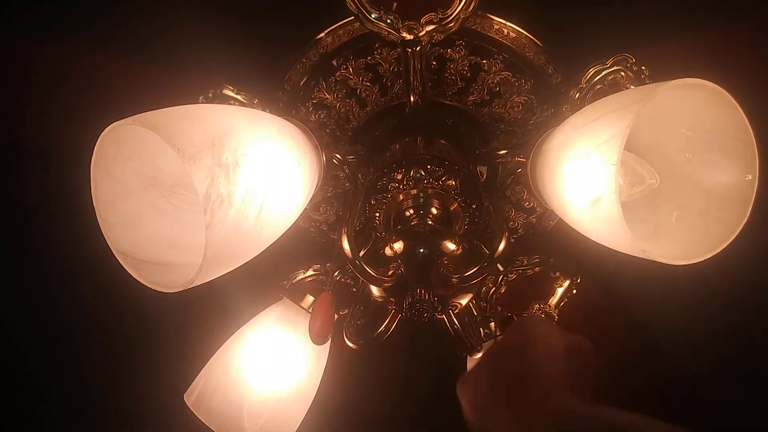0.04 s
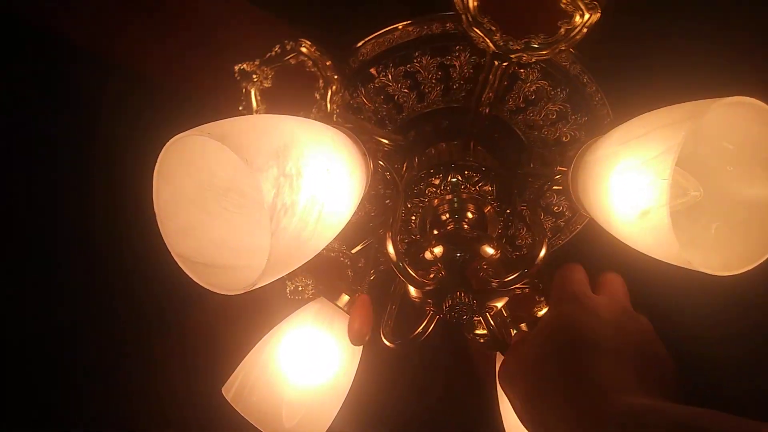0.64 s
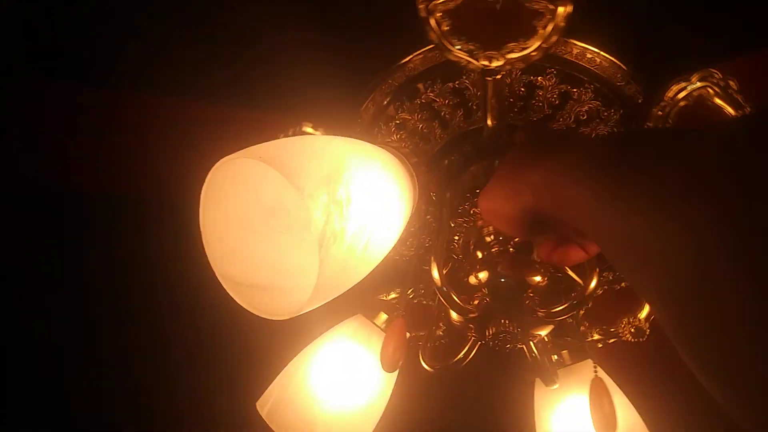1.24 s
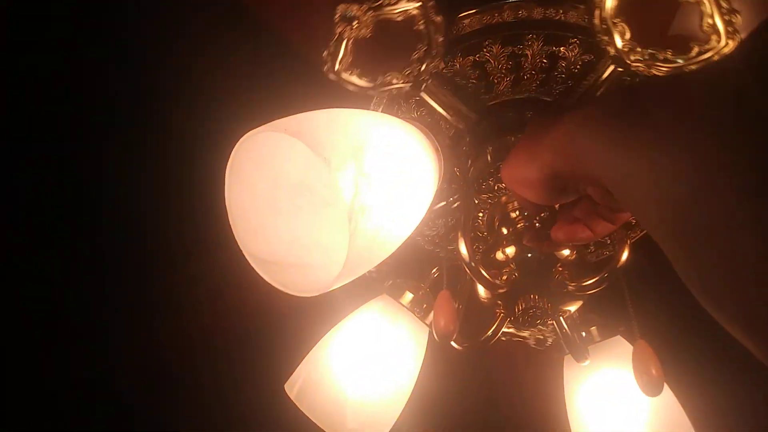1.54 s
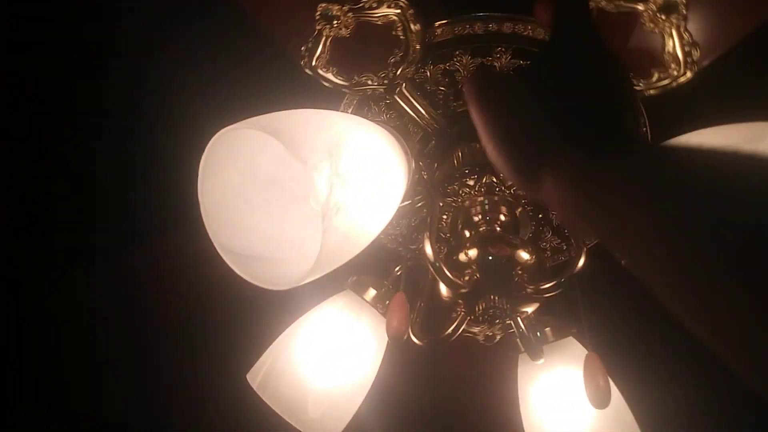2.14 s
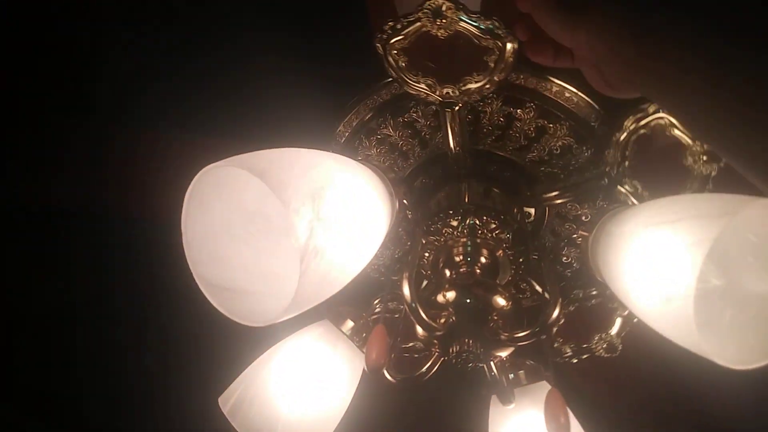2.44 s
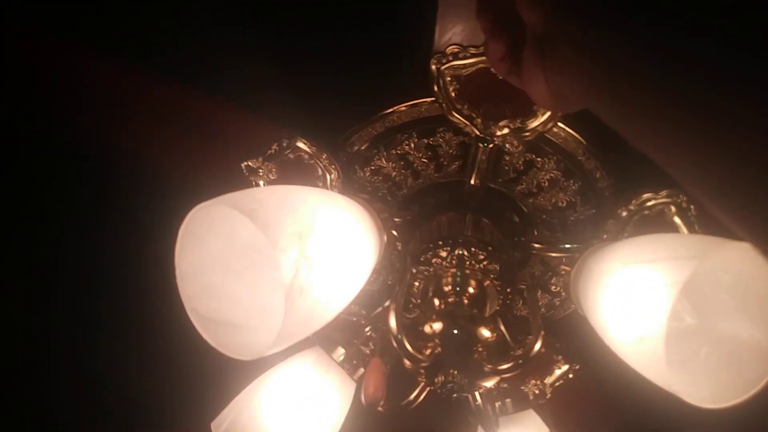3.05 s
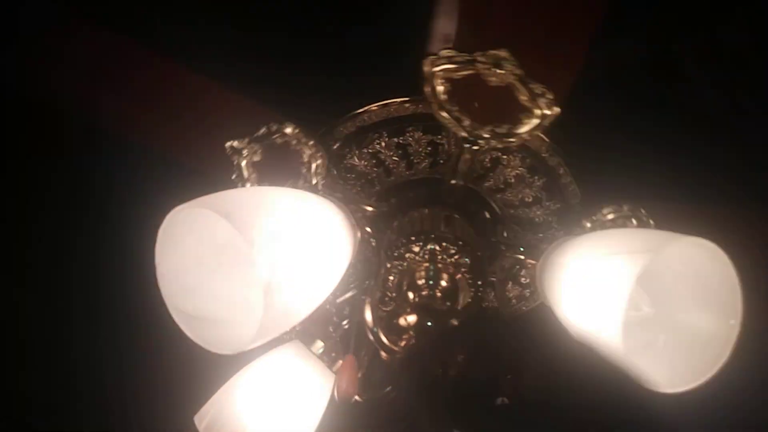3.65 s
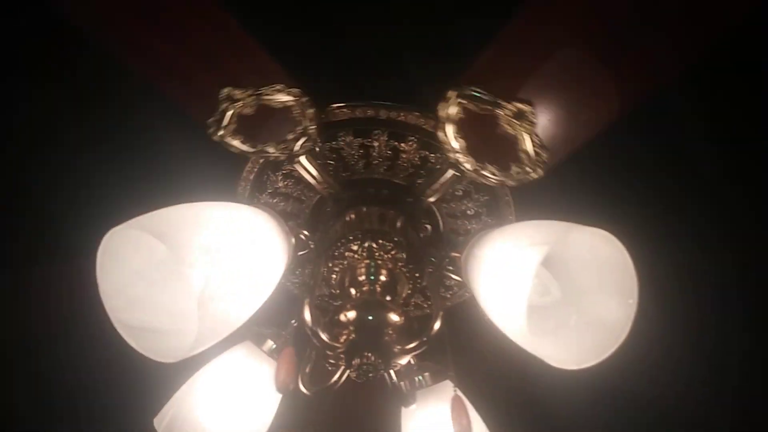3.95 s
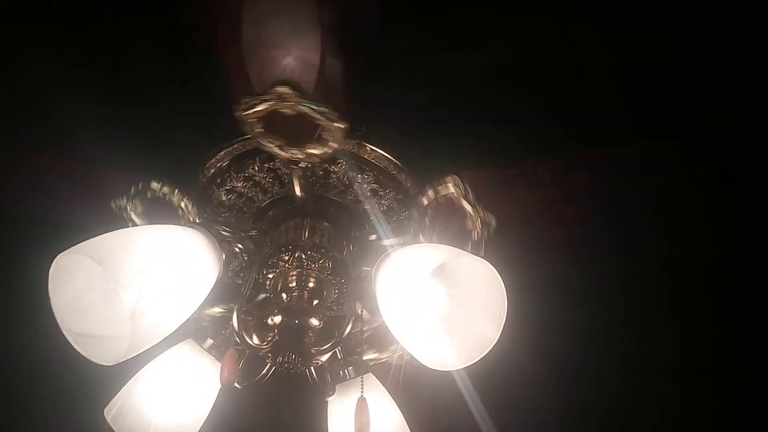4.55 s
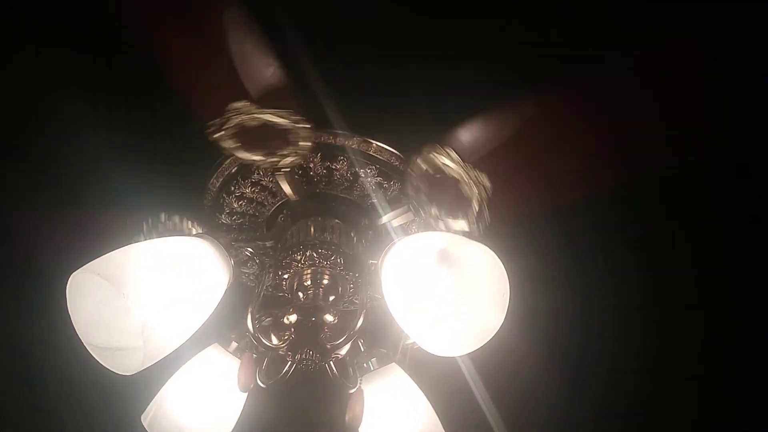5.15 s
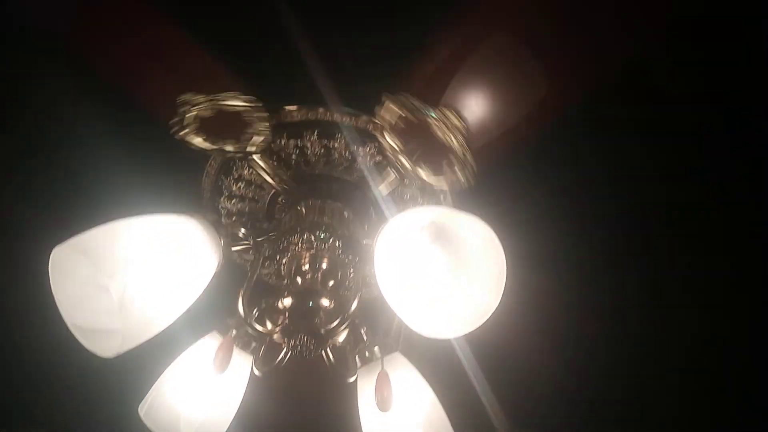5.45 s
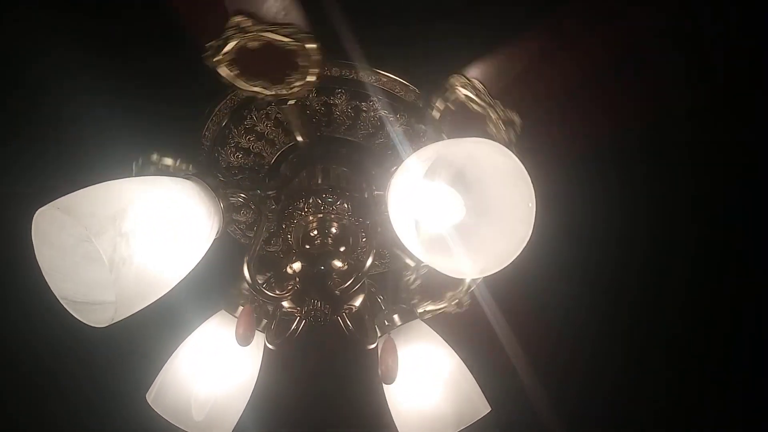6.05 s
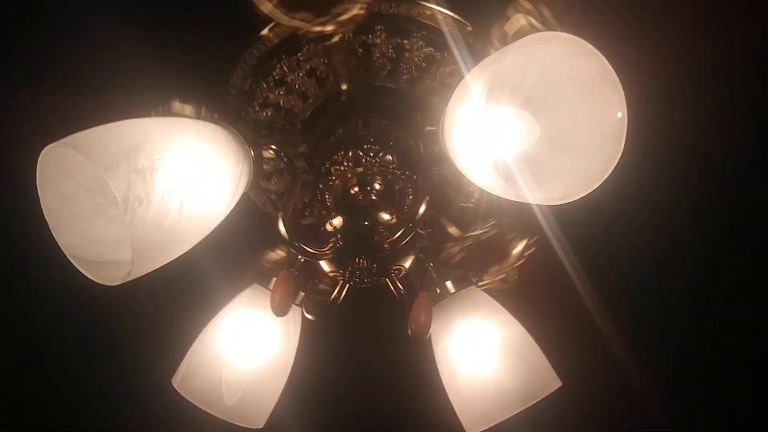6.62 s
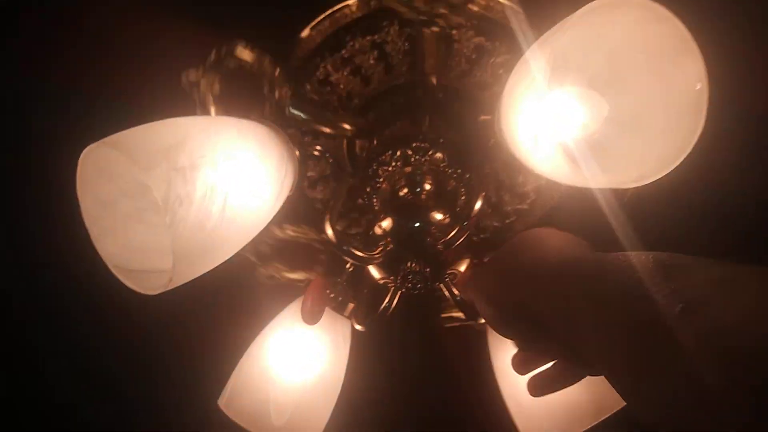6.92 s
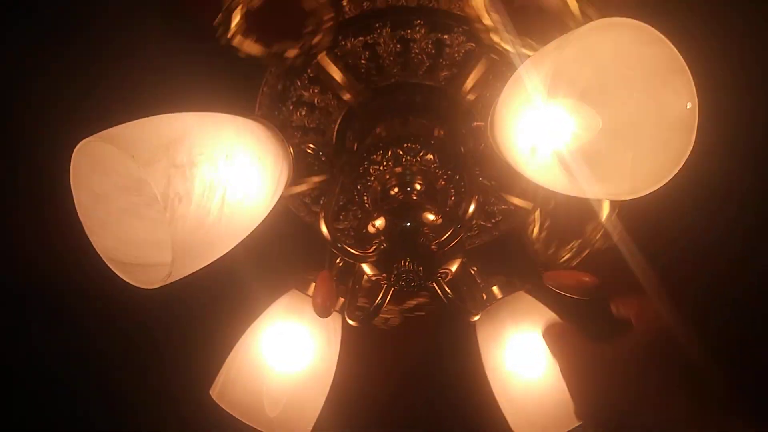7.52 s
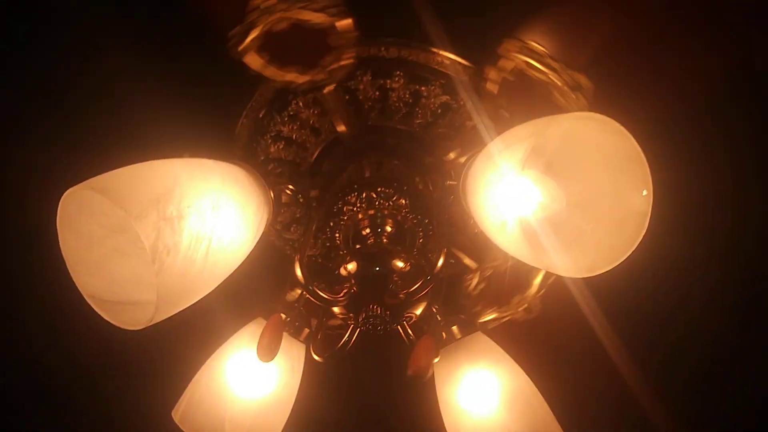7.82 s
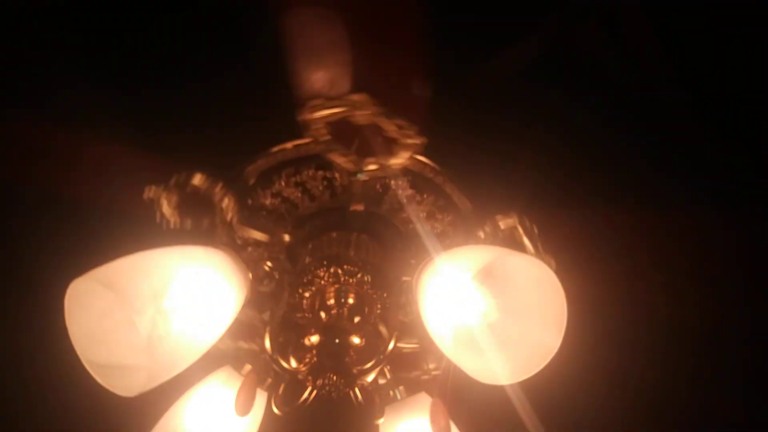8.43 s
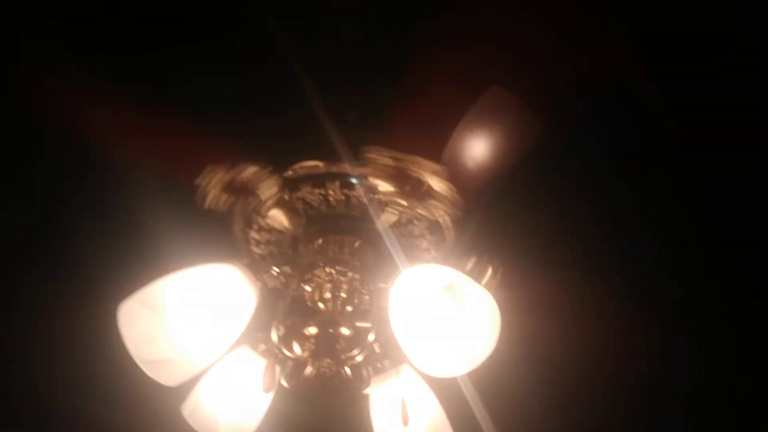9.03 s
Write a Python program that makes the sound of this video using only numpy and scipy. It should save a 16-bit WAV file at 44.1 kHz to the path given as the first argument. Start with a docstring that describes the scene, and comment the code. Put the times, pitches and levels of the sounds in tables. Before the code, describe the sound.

Sharp metallic snaps and bead ticks from a fan's pull chain in a quiet room, against a high hiss that whistles about once a second.

```python
"""A quiet room, close to a ceiling fan whose pull-chain switch is worked a few times.
Chain beads tick through the ferrule; the ratchet slips, snaps and briefly rings the metal housing.
A hand bumps softly among light rustles and faint, breath-like swells of noise.
Behind them lie faint air, a thin electrical whine and a steady high hiss that swirls about
once a second: it sinks in pitch, whistles and goes dull for a moment."""
import sys
import numpy as np
from scipy import signal
from scipy.fft import rfft, irfft
from scipy.io import wavfile
from scipy.ndimage import uniform_filter1d

SR = 44100
rng = np.random.default_rng(int(sys.argv[2]) if len(sys.argv) > 2 else 0)


def unload_wav(signal):
    """Save mono or channel-first audio to the path in sys.argv[1] as 16-bit WAV at rate SR, clipped to [-1, 1]."""
    wavfile.write(
        sys.argv[1],
        SR,
        np.round(np.clip(np.atleast_2d(signal).T, -1, 1) * 32767).astype(np.int16),
    )


N = 409248
TIME = np.arange(N) / SR
AGE = TIME[:SR // 2]  # seconds since a contact


def undb(db):
    """Decibels to gain."""
    return 10 ** (np.asarray(db) / 20)


def unit_rms(x):
    """Scale to rms 1."""
    return x / np.sqrt(np.mean(x ** 2))


def spectrum(colour, size):
    """Gain of a (Hz, dB) outline at each FFT bin."""
    hz, db = np.transpose(colour)
    bin_hz = np.fft.rfftfreq(size, 1 / SR)
    return undb(np.interp(np.log(bin_hz + 1), np.log(hz), db))


def noise(colour):
    """Steady coloured noise, rms 1."""
    white = rfft(rng.standard_normal(N))
    return unit_rms(irfft(white * spectrum(colour, N), N))


def wander(rate_hz):
    """Smooth random curve, rms 1."""
    hold = int(SR / rate_hz)
    steps = np.repeat(rng.standard_normal(N // hold + 1), hold)
    return unit_rms(uniform_filter1d(steps, hold)[:N])


def streaks(bins, frames):
    """Random field, narrow in frequency and drawn out in time, rms 1."""
    field = rng.standard_normal((bins, frames))
    for _ in range(2):
        field = uniform_filter1d(field, size=2, axis=0)
        field = uniform_filter1d(field, size=6, axis=1)
    return unit_rms(field)


def swell(peak_s, sigma_s, time=TIME):
    """Gaussian rise and fall, peak 1."""
    return np.exp(-.5 * ((time - peak_s) / sigma_s) ** 2)


def add(track, start_s, sound):
    """Mix a sound into a track."""
    start = int(start_s * SR)
    track[start:start + len(sound)] += sound[:N - start]


# Room air spectrum. Each row: frequency in Hz, relative level in dB.
AIR_SPECTRUM = [(25, -34), (80, -24.5), (150, -17), (250, -5), (420, 0.5), (950, 2.5), (1500, -0.5),
                (2300, 0.5), (4000, -16), (9000, -38)]


def room_air(level_db=-64.0, drift_db=.5):
    """Faint air noise whose level drifts slightly."""
    return noise(AIR_SPECTRUM) * undb(level_db + drift_db * wander(2.89))


# Spells of whine. Each row: start in seconds, end in seconds.
WHINE_SPANS = [(.78, 1.38), (4.52, 5.3)]


def electrical_whine(level_db=-73, pitch_hz=14000):
    """A thin electrical tone that switches on and off."""
    gate = sum(((TIME > start_s) & (TIME < end_s)).astype(float) for start_s, end_s in WHINE_SPANS)
    tone = np.sin(2 * np.pi * pitch_hz * TIME)
    return undb(level_db) * uniform_filter1d(gate, size=400) * tone


# Swirls of the hiss. Each row: time in seconds, whistle level in dB, its sigma in seconds,
# its pitch in Hz, extra gain of its lowest tone in dB.
SWIRL_EVENTS = [(0.21, -38, 0.047, 4090, 0), (1.372, -39, 0.096, 3990, 7.5), (2.293, -40.5, 0.15, 4030, 9),
                (3.472, -44, 0.12, 3985, 7), (4.53, -39, 0.082, 3920, -3), (5.57, -38.5, 0.12, 3916, -7),
                (6.544, -36, 0.079, 3893, 1.5), (7.57, -36, 0.049, 3937, 2), (8.49, -39, 0.092, 3930, 0),
                (9.25, -42, 0.054, 4020, 0)]
# Tones of a whistle. Each row: ratio to the pitch, relative level in dB.
WHISTLE_TONES = [(.812, -15.5), (.904, -9), (1, 0.5), (1.093, -4), (1.182, -31), (1.285, -23), (1.379, -39),
                 (1.476, -19)]


def whistle(linewidth_hz=9, flutter_db=2, lead_s_per_octave=0.13):
    """At each swirl a ladder of thin, fluttering tones swells out of the hiss, highest first."""
    out = np.zeros(N)
    for rung, (ratio, tone_db) in enumerate(WHISTLE_TONES):
        phase_walk = uniform_filter1d(np.cumsum(rng.standard_normal(N)), size=200)
        drift_rad = phase_walk * np.sqrt(2 * np.pi * linewidth_hz / SR)
        flutter = undb(tone_db + flutter_db * wander(60))
        for swirl_s, level_db, sigma_s, pitch_hz, lowest_db in SWIRL_EVENTS:
            peak_s = swirl_s - lead_s_per_octave * np.log2(ratio)
            span = slice(max(0, int((peak_s - 4 * sigma_s) * SR)), int((peak_s + 4 * sigma_s) * SR))
            tone = np.sin(2 * np.pi * ratio * pitch_hz * TIME[span] + drift_rad[span])
            gain = undb(level_db + lowest_db * (rung == 0))
            out[span] += gain * swell(peak_s, sigma_s, TIME[span]) * flutter[span] * tone
    return out


# Hiss spectrum. Each row: frequency in Hz, relative level in dB.
HISS_SPECTRUM = [(900, -47.5), (2200, -32.5), (2630, -24), (3000, -13.5), (3500, -5), (3900, 1), (4650, 1),
                 (5230, -6.5), (5670, -14), (6260, -18.5), (7300, -26), (8600, -37), (12000, -39.5),
                 (15500, -40.5)]
# Dulling after a swirl. Each row: frequency in Hz, gain at the deepest point in dB.
DULLING_EQ = [(2800, -2), (3500, -0.5), (4100, -2), (4900, -2.5), (6100, -3), (7500, -0.5)]


def hiss(level_db=-39, streak_db=2.25, crest_db=1.5, crest_sigma_hz=320, sink_hz_per_s=4000):
    """Narrow high hiss, slowly brightening; at each swirl a crest slides down it, then it dulls."""
    hz, time, bands = signal.stft(noise(HISS_SPECTRUM), SR, nperseg=2048)
    hz = hz[:, None]
    octaves = np.log2(np.clip(hz, 2900, 6500) / 4200)
    tilt_db_per_octave = -1.16 + 0.24 * time
    gain_db = level_db + octaves * tilt_db_per_octave
    dull_db = np.interp(hz, *np.transpose(DULLING_EQ))
    for swirl_s, _, _, pitch_hz, _ in SWIRL_EVENTS:
        centre_hz = pitch_hz - sink_hz_per_s * (time - swirl_s)
        crest = np.exp(-.5 * ((hz - centre_hz) / crest_sigma_hz) ** 2)
        gain_db += crest_db * crest * swell(swirl_s - 0.13, sigma_s=0.061, time=time)
        gain_db += dull_db * swell(swirl_s + .05, sigma_s=0.082, time=time)
    gain_db += streak_db * streaks(*bands.shape) * (hz < 7000)
    return signal.istft(bands * undb(gain_db))[1][:N]


# Rustles and breath-like swells. Each row: peak time in seconds, level in dB, sigma in seconds.
RUSTLE_SWELLS = [(1.3, -51.5, 0.12), (4.047, -53.5, 0.1), (4.66, -56.5, 0.032), (5.16, -48.5, 0.03),
                 (5.304, -57.5, 0.039), (5.886, -50, 0.022), (6.347, -52.5, 0.021), (6.49, -36.5, 0.01),
                 (6.53, -46.5, 0.044), (8.14, -53, 0.02), (8.52, -52.5, 0.02), (8.765, -52.5, 0.05),
                 (9.23, -52, 0.043)]
# Their spectrum. Each row: frequency in Hz, relative level in dB.
RUSTLE_SPECTRUM = [(100, -31), (250, -30), (500, -0.5), (1000, -0.5), (1800, 4), (2400, 6.5), (4000, 1),
                   (7000, -13), (10000, -23.5), (15000, -41)]


def rustles(grain_db=2.5, grain_hz=120):
    """Soft rustles and faint, longer breath-like swells of noise."""
    envelope = sum(undb(db) * swell(peak_s, sigma_s) for peak_s, db, sigma_s in RUSTLE_SWELLS)
    return envelope * undb(grain_db * wander(grain_hz)) * noise(RUSTLE_SPECTRUM)


# Soft bumps: mostly the hand, plus low thumps under the snaps at 1.713 s and 7.392 s. Each row: start in
# seconds, gain in dB, decay time constant in seconds.
BUMPS = [(1.008, -38.5, 0.0034), (1.164, -46.5, 0.042), (1.265, -58.5, 0.085), (1.713, -45, .015),
         (1.99, -56.5, .04), (3.768, -48, 0.0097), (4.075, -46, 0.034), (4.314, -58, 0.034),
         (4.403, -55.5, 0.055), (6.476, -55.5, 0.047), (6.656, -46, 0.009), (6.709, -43.5, 0.0092),
         (7.392, -52, 0.036), (8.492, -45, 0.021)]
# Bump spectrum. Each row: frequency in Hz, relative level in dB.
BUMP_SPECTRUM = [(60, -49), (130, -13.5), (250, 1), (450, 5.5), (800, 3), (1500, -3.5), (3000, -6),
                 (9000, -38)]


def bumps(attack_s=0.0017, bass_cycles=4):
    """Dull bumps that die quickly; the briefest have the least bass."""
    out, knock = np.zeros(N), noise(BUMP_SPECTRUM)
    for start_s, gain_db, decay_s in BUMPS:
        highpass = signal.butter(2, bass_cycles / decay_s, "high", fs=SR, output="sos")
        body = signal.sosfilt(highpass, knock[int(start_s * SR):][:len(AGE)])
        envelope = (1 - np.exp(-AGE / attack_s)) * np.exp(-AGE / decay_s)
        add(out, start_s, undb(gain_db) * envelope * body)
    return out


def low_thump(level_db=-52):
    """A very faint, brief low thump under one loud snap."""
    return undb(level_db) * swell(peak_s=7.272, sigma_s=0.00094)


def impact(colour, body_db, treble_db, size=1024):
    """Minimum-phase crack of one contact, shelved below and above its main resonance."""
    shelves = spectrum([(2000, body_db), (3600, 0.01), (4800, 0), (7500, treble_db)], size)
    base = spectrum(colour, size)
    cepstrum = irfft(np.log(base * shelves))
    cepstrum[1:size // 2] *= 2
    cepstrum[size // 2 + 1:] = 0
    return irfft(np.exp(rfft(cepstrum))) / base.mean()


def room_response(scatter_db, scatter_s, tail_db, t60_s=0.35, onset_s=0.0017):
    """Direct sound, quick scatter from the glass shades and ceiling, then the room's tail."""
    scatter = undb(scatter_db) * np.exp(-AGE / scatter_s) * rng.standard_normal(len(AGE))
    tail = undb(tail_db - 60 * AGE / t60_s) * rng.standard_normal(len(AGE))
    response = (scatter + tail) * (1 - np.exp(-(AGE / onset_s) ** 2))
    response[0] = 1
    return response


# Bead ticks. Each row: start in seconds, gain in dB, treble shelf in dB.
BEAD_TICKS = [(0.0592, -17.5, -1), (0.077, -14.5, 1), (0.5328, -16, 4), (1.781, -22, -12), (7.1158, -15, 0),
              (7.135, -15, -3), (7.2352, -24, 13), (7.2578, -17.5, 10), (7.362, -17.5, 3),
              (7.373, -13.5, -2), (7.4518, -21, 13.5), (7.4716, -16, 4), (7.579, -33.5, 15),
              (7.9437, -40, 16), (7.9924, -39, 28)]
# Tick spectrum. Each row: frequency in Hz, relative level in dB.
BEAD_SPECTRUM = [(150, -58), (700, -19.5), (1300, -18.5), (1900, -2.5), (2400, -2.5), (2800, -4.5),
                 (4200, -1.5), (6500, -23.5), (9000, -30), (15000, -29.5)]


def chain():
    """Beads catch on the ferrule as the chain is drawn out and let back."""
    out = np.zeros(N)
    for start_s, gain_db, treble_db in BEAD_TICKS:
        room = room_response(scatter_db=-14, scatter_s=.003, tail_db=-34)
        tick = impact(BEAD_SPECTRUM, body_db=0, treble_db=treble_db)
        add(out, start_s, undb(gain_db) * signal.fftconvolve(tick, room))
    return out


def ring(hz, level_db, t60_s):
    """One struck mode; it builds up over the first cycles."""
    attack = 1 - np.exp(-(hz * AGE) ** 2)
    return attack * undb(level_db - 60 * AGE / t60_s) * np.sin(2 * np.pi * hz * AGE)


# Switch housing modes. Each row: frequency in Hz, relative level in dB, T60 in seconds.
HOUSING_MODES = [(448, -58, 0.55), (1365, -43, 0.17), (1810, -35, 0.063), (2110, -48, 0.45),
                 (2280, -38, 0.13), (2834, -32.5, 0.17), (2910, -30.5, 0.07), (3246, -46, 0.7),
                 (4510, -19, 0.1)]


def housing(struck_hz, boost_db=8, detune=0.0057, rattle=.7):
    """The metal housing rings; the strike point favours one mode and loose parts roughen each tone."""
    out = 0
    for hz, level_db, t60_s in HOUSING_MODES:
        wobble = unit_rms(uniform_filter1d(rng.standard_normal(len(AGE)), size=500))
        detuned_hz = hz * (1 + detune * rng.standard_normal())
        strike_db = boost_db * np.exp(-((hz - struck_hz) / 80) ** 2)
        tone = ring(detuned_hz, level_db + strike_db, t60_s)
        out += tone * (1 + rattle * wobble) / np.hypot(1, rattle)
    return out


def chatter(crack, split_hz=6400, decay_s=.0012):
    """The metal faces skid briefly, spreading the top of the crack into a tiny rasp."""
    low = signal.sosfilt(signal.butter(4, split_hz, "low", fs=SR, output="sos"), crack)
    high = signal.sosfilt(signal.butter(4, split_hz, "high", fs=SR, output="sos"), crack)
    skid = rng.standard_normal(400) * np.exp(-AGE[:400] / decay_s)
    return low + np.convolve(high, skid / np.linalg.norm(skid))[:len(crack)]


# Pawl crack spectrum. Each row: frequency in Hz, relative level in dB.
CRACK_SPECTRUM = [(100, -91), (400, -36), (900, -23.5), (1400, -18.5), (1800, -9), (2050, -18.5),
                  (2800, -3.5), (3300, 1.5), (4100, 12), (5000, -3), (5800, -5), (6500, -17.5),
                  (10000, -21), (15000, -33)]


def pawl_contact(body_db, treble_db, pawl_hz, pawl_db, struck_hz):
    """One contact cracks, rings the pawl for some milliseconds and shakes the housing."""
    room = room_response(scatter_db=-22, scatter_s=.005, tail_db=-39)
    crack = chatter(impact(CRACK_SPECTRUM, body_db, treble_db))
    crack = signal.fftconvolve(crack, room)[:len(AGE)]
    return crack + ring(pawl_hz, pawl_db, t60_s=0.026) + undb(0.45 * body_db) * housing(struck_hz)


# Ratchet snaps. Each row: snap time in seconds, gain in dB, body shelf in dB, treble shelf in dB,
# pawl pitch in Hz, pawl ring in dB, favoured housing frequency in Hz, slip lead in seconds,
# slip gain relative to the snap in dB.
RATCHET_SNAPS = [(0.0936, -8, 6, 11, 4370, -11, 1810, 0.0026, -15),
                 (.5459, -4, 2.5, 2.5, 3900, -19, 2110, .0012, -5.5),
                 (1.71, -7.5, 8.5, 8.5, 4060, -10, 2790, .0016, -15),
                 (1.7916, -11, -8, -10, 4220, -3.5, 1810, 0.0014, -14),
                 (7.1496, -14.5, 13, 17, 4260, -11, 2300, 0.00274, -8.5),
                 (7.2707, -3.5, 4.5, 3.5, 5030, -8.5, 2380, 0.00105, -17),
                 (7.385, -11, 8, 12, 4300, -15, 440, .0023, 0),
                 (7.4908, -2, -4, 5, 4100, -16.5, 1810, .001, -20)]


def ratchet(slip_body_db=-2.5, highpass_hz=330):
    """The pawl slips off its tooth with a thinner click, then snaps home 1-3 ms later."""
    out = np.zeros(N)
    for snap_s, db, body_db, treble_db, pawl_hz, pawl_db, struck_hz, lead_s, slip_db in RATCHET_SNAPS:
        slip = pawl_contact(body_db + slip_body_db, treble_db, pawl_hz, pawl_db, struck_hz)
        snap = pawl_contact(body_db, treble_db, pawl_hz, pawl_db, struck_hz)
        add(out, snap_s - lead_s, undb(db + slip_db) * slip)
        add(out, snap_s, undb(db) * snap)
    # parts this small radiate hardly any bass
    return signal.sosfilt(signal.butter(2, highpass_hz, "high", fs=SR, output="sos"), out)


def scene():
    """Switch, chain, bumps and rustles against the hiss, in mono."""
    foreground = ratchet() + chain() + low_thump() + bumps() + rustles()
    background = hiss() + room_air() + whistle() + electrical_whine()
    return (foreground + background)[None]


def record(dry):
    """Steep low-pass at 15.9 kHz."""
    return signal.sosfilt(signal.ellip(10, .2, 70, 15900, fs=SR, output="sos"), dry)


dry = scene()
out = record(dry)
unload_wav(out)
```